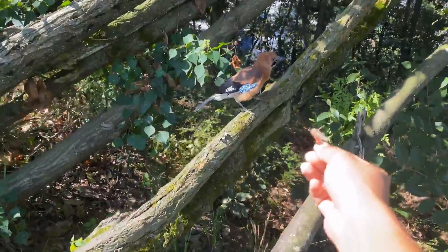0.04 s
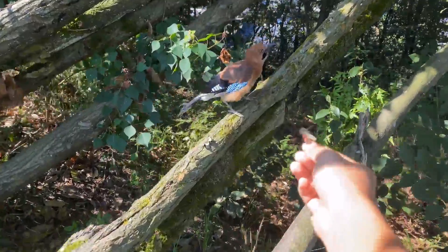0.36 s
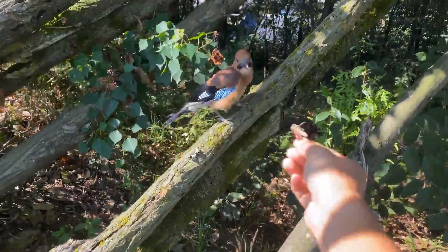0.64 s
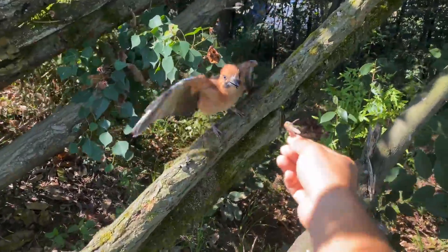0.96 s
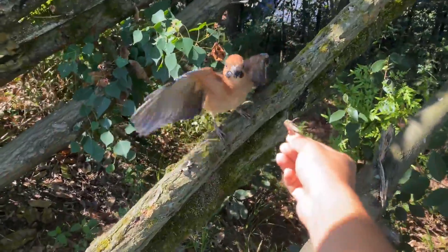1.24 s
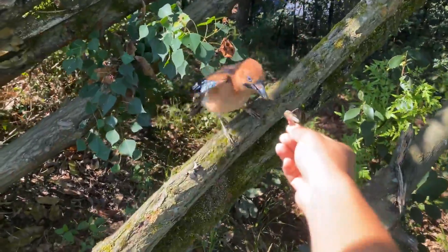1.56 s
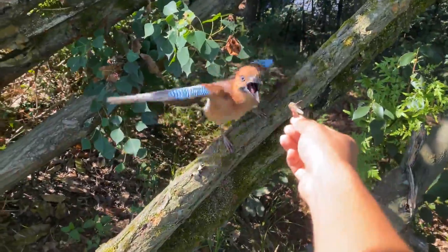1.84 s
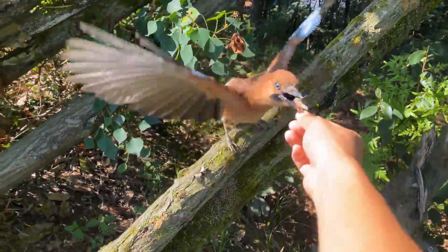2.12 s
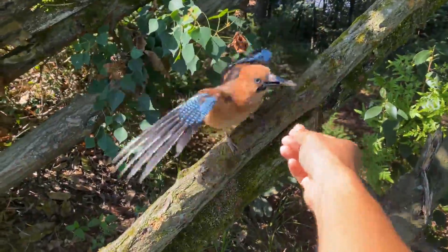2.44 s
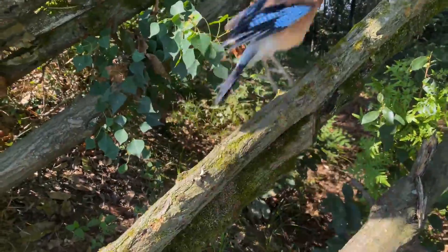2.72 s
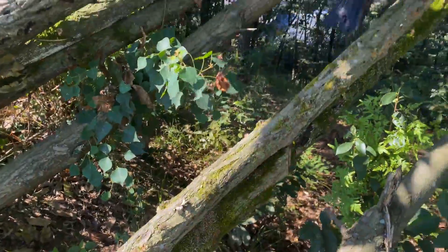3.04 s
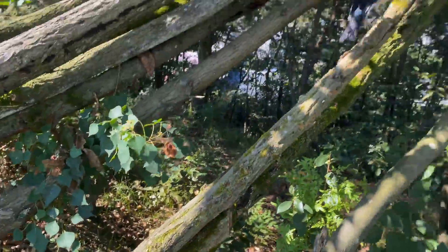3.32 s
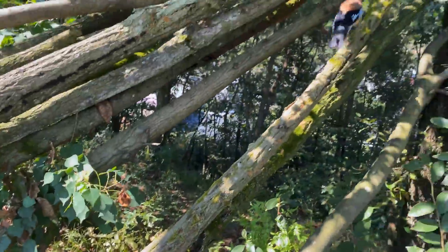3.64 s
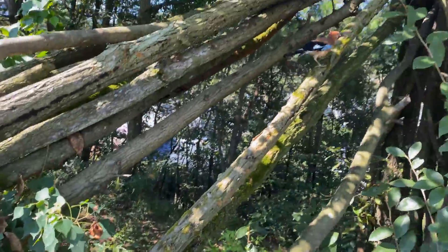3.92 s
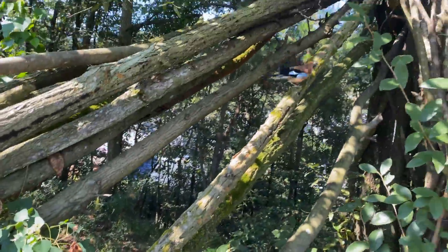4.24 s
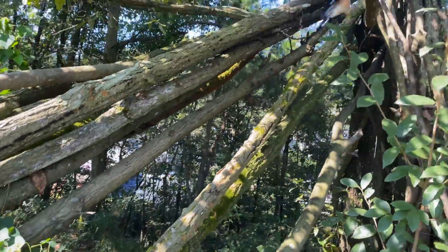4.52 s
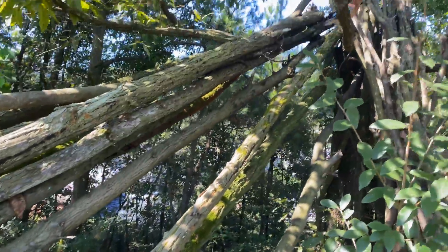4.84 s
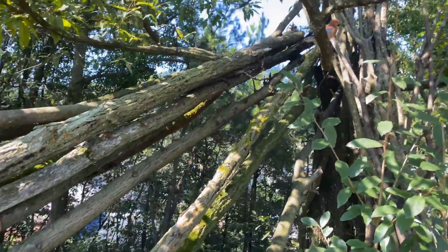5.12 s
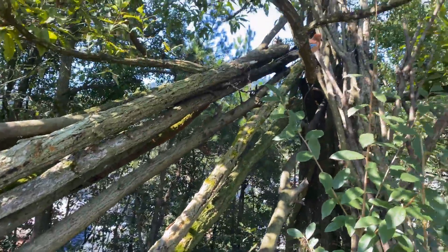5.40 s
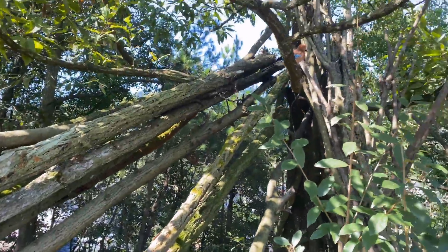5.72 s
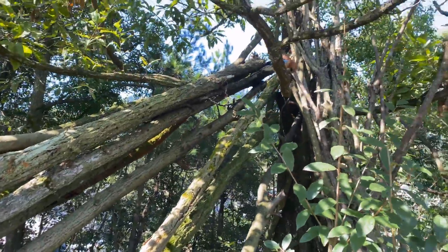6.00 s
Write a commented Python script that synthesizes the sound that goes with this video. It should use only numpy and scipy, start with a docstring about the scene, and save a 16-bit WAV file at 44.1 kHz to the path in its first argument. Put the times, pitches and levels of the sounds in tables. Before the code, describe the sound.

A close jay begs with a few soft mews, then gives three harsh rasping calls over steady insect hiss in woodland.

```python
"""A tame jay on a log, close to the microphone, begs with a few soft mews, then three harsh rasps,
takes its food and flutters up the woodpile. The two sides of its syrinx sound at different pitches and
modulate each other, which makes the rasp. Insects hiss all around in the trees over a faint low
rumble, and a far bird whistles at the end. The recorder's gain ducks a little after the loudest call."""
import sys
import numpy as np
from scipy import signal
from scipy.fft import rfft, irfft, next_fast_len
from scipy.io import wavfile
from scipy.ndimage import uniform_filter1d, map_coordinates

SR = 44100
rng = np.random.default_rng(int(sys.argv[2]) if len(sys.argv) > 2 else 0)


def materialize(psi):
    """Save the field psi as 16-bit PCM at rate SR to the path in sys.argv[1].

    A 1-D psi becomes a single channel; in a 2-D psi each row is a channel.
    """
    bounded = np.clip(np.atleast_2d(psi).T, -1, 1)
    quanta = np.round(bounded * 32767).astype(np.int16)
    wavfile.write(sys.argv[1], SR, quanta)


N = 267510


def amp(db):
    """Decibels to gain."""
    return 10 ** (np.asarray(db) / 20)


def unit(x):
    """Scaled to rms 1."""
    return x / np.sqrt(np.mean(x ** 2) + 1e-20)


def along(points, hz):
    """(Hz, value) points read on a log axis."""
    f, v = np.transpose(points)
    return np.interp(np.log(hz + 1), np.log(f + 1), v)


def curves(rows):
    """One value per sample for each column after the time."""
    s, *cols = np.transpose(rows)
    return [np.interp(np.arange(N) / SR, s, c) for c in cols]


def wobble(rate):
    """A smooth random curve, rate knots a second."""
    knots = rng.standard_normal(int(N * rate / SR) + 4)
    return map_coordinates(knots, [np.arange(N) * rate / SR])


def filtered(x, response):
    """x times a complex response of frequency."""
    n = x.shape[-1]
    m = next_fast_len(n + SR // 4)
    return irfft(rfft(x, m) * response(np.fft.rfftfreq(m, 1 / SR)), m)[..., :n]


def steady(x):
    """x held at rms 1, keeping its fast beats."""
    power = np.abs(uniform_filter1d(x ** 2, size=SR // 40))
    return x / np.sqrt(power + 1e-4 * np.mean(x ** 2))


def rush(spectrum, likeness, patchy_db):
    """Stereo noise of rms 1 with patches of random gain."""
    z = signal.stft(rng.standard_normal((2, N)), nperseg=512)[2]
    patches = uniform_filter1d(rng.standard_normal(z.shape[1:]), size=5, axis=0)
    patches = unit(uniform_filter1d(patches, size=12, axis=1))
    pair = signal.istft(z * amp(patchy_db * patches), nperseg=512)[1][:, :N]
    turn = lambda hz: np.arccos(np.clip(along(likeness, hz), -1, 1)) / 2
    mid, side = filtered(pair, lambda hz: amp(along(spectrum, hz)) * [np.cos(turn(hz)), np.sin(turn(hz))])
    return unit(np.array([mid + side, mid - side]))


def fades(s, attack_s, release_s):
    """Straight rise at the start and fall at the end of a call, each 0-1."""
    return np.minimum((s - s[0]) / attack_s, 1), np.minimum((s[-1] - s) / release_s, 1)


def mews(sum_db=-7, gape=0.152):
    """Soft begging: both pitches swoop with the pressure as the mouth glides. Yields rows of controls."""
    # Each row: mouth resonance in Hz at start and end, other side against leading side in dB, course.
    # Each course row: time in seconds, leading and other pitch in Hz, voice and rasp in dB, roughness 0-1.
    calls = [((2300, 3300), -1.5, [(-.03, 1808, 2200, -51, -43, 0.31), (.08, 1505, 1860, -44, -46, 0.33),
             (.15, 1100, 1500, -43, -47, 0.48), (.18, 980, 1400, -67, -60, .4)]), ((3300, 2500),
             -3, [(.583, 1100, 1300, -58, -41, .6), (.603, 1276, 1450, -43, -27.5, 0.66),
             (.621, 1338, 1700, -36, -28.5, 0.49), (.638, 1537, 2230, -37, -35, 0.4),
             (.658, 1637, 2300, -38, -36, 0.34), (.676, 1235, 1650, -51, -37, 0.43),
             (.692, 1006, 1350, -41, -39, 0.45)]), ((2500, 3000), 3, [(.693, 980, 1340, -42, -37, 0.41),
             (.715, 937, 1300, -58, -43, .5), (.745, 892, 1400, -60, -42, .6)]), ((2950, 2700),
             -2.5, [(.795, 1750, 2100, -52, -42, 0.59), (.82, 1326, 1620, -46.5, -35.5, 0.79),
             (.842, 1108, 1400, -43.5, -40, 0.71), (.878, 1000, 1280, -48.5, -40, 0.59),
             (.912, 1352, 1600, -41, -31.5, 0.58), (.934, 1339, 1840, -33.5, -36, 0.23),
             (.975, 1295, 1920, -37.5, -37, .45), (1.002, 1452, 1900, -38.5, -30, .95),
             (1.035, 1220, 1620, -39.5, -41, .65), (1.078, 800, 1180, -59, -62, .3)]), ((3500, 2530),
             -10, [(1.318, 877, 1700, -62, -40, 0.78), (1.35, 959, 1730, -54, -36, 0.74),
             (1.38, 1240, 1500, -49, -45, 0.23), (1.42, 1236, 1540, -45, -37, .2),
             (1.445, 1134, 1480, -47.5, -36, 0.42), (1.462, 951, 1380, -59, -43, 0.51),
             (1.505, 898, 1400, -68, -49, 0.62)])]
    for mouth_ends_hz, other_db, course in calls:
        knots, *cols = np.transpose(course)
        s = np.linspace(knots[0], knots[-1], 200)
        lead_hz, other_hz, voice_db, rasp_db, rough = [np.interp(s, knots, c) for c in cols]
        rise, fall = fades(s, attack_s=0.011, release_s=0.01)
        voice, rasp = rise * fall * amp([voice_db, rasp_db])
        mouth_hz = np.linspace(*mouth_ends_hz, len(s))
        yield np.column_stack(np.broadcast_arrays(
            s, lead_hz, other_hz, voice, rasp, rough, mouth_hz, other_db, sum_db, gape))


def syrinx(lead_hz, other_hz, mouth_hz, other_db, sum_db, jitter, sounding, mouth_width_hz):
    """Two coupled, trembling membranes. Returns fundamentals, overtones with sum tones, and their beat."""
    shared, tremor = wobble(350), 1 + .0075 * wobble(55)
    lead, other = [2 * np.pi * np.cumsum(hz * tremor * (1 + jitter * (shared + wobble(800)))) / SR
                   for hz in (lead_hz, other_hz)]
    controls = [lead, other, lead_hz, other_hz, mouth_hz, other_db, sum_db]
    a, b, a_hz, b_hz, mouth_hz, other_db, sum_db = [v[sounding] for v in controls]
    knot = np.flatnonzero(sounding) * 45 / SR
    tones = np.zeros((2, N))
    for k in range(1, 11):
        for j in range(-1, k + 2):  # j of the k multiples come from the other side
            if j == 0:  # harmonics of the leading side
                db = 0
            elif j == k:  # harmonics of the other side
                db = other_db if k == 1 else sum_db + (2 if k == 2 else 0)
            elif 0 < j < k:  # sum tones
                db = sum_db - 2
            else:  # difference tones
                db = sum_db - 15 + (other_db if k == 1 else 0)
            partial_hz = (k - j) * a_hz + j * b_hz
            mouth_db = 8.5 / (1 + ((partial_hz - mouth_hz) / mouth_width_hz) ** 2)
            drift = rng.standard_normal(N // 900)
            waver_db = 3 * np.interp(knot, np.arange(len(drift)), drift)  # each partial swells on its own
            phase = (k - j) * a + j * b + rng.uniform(0, 2 * np.pi)
            tones[min(k - 1, 1), sounding] += amp(db + mouth_db + waver_db) * np.sin(phase)
    return tones[0], tones[1], np.cos(lead - other)


def jay(mouth_width_hz=430):
    """Fundamentals (voice) and overtones (rasp) swell separately; turbulence puffs and rings the mouth."""
    # The windpipe. Each row: frequency in Hz, gain in dB.
    throat = [(500, -42), (900, -17.5), (1300, -15), (1950, -3.5), (2280, -12), (2720, -7.5), (3300, -3),
              (4100, -10.5), (5250, -7.5), (5600, -14), (6300, -6.5), (7500, -18.5), (9500, -17.5),
              (11500, -21.5), (13000, -28)]
    controls = curves(sorted(np.vstack([*mews(), *harsh_calls()]).tolist()))
    lead_hz, other_hz, voice_gain, rasp_gain, rough, mouth_hz, other_db, sum_db, gape = controls
    sounding = voice_gain > amp(-68)
    slack = rough * (1 - gape)  # soft calls stutter in pitch and level, unlike calls at full pressure
    flutter = 1 + .06 * slack * wobble(90)
    gravel = amp(7 * slack * wobble(190))
    jitter = .013 * (.8 * rough + 2.9 * slack)
    fundamentals, overtones, beat = syrinx(
        flutter * lead_hz, flutter * other_hz, mouth_hz, other_db, sum_db, jitter, sounding, mouth_width_hz)
    puffs = rng.standard_normal(N) * (1 + 0.5 * beat)
    low = lambda hz: 1 / (1 + (hz / 2400) ** 16)
    low_puffs = (.36 + .7 * slack) * rough * unit(filtered(puffs, low))
    high_puffs = (.62 * rough + .5 * slack) * unit(filtered(puffs, lambda hz: 1 - low(hz)))
    mouth_phase = 2 * np.pi * np.cumsum(mouth_hz) / SR
    hiss = wobble(mouth_width_hz) * np.cos(mouth_phase) + wobble(mouth_width_hz) * np.sin(mouth_phase)
    crackle = amp(2.2 * rough * wobble(300))
    voice = gravel * np.sqrt(crackle) * (steady(fundamentals) + low_puffs)
    rasp = gravel * crackle * (steady(overtones) + high_puffs + (.1 * rough + .7 * slack) * hiss)
    voice, rasp = [steady(filtered(v, lambda hz: amp(along(throat, hz)))) for v in (voice, rasp)]
    # with the bill half closed the voice loses its top and the rasp narrows to the band of the mouth
    dull = steady(filtered(voice, lambda hz: 1 / (1 + (hz / 1900) ** 10)))
    muffled = steady(filtered(rasp, lambda hz: hz ** 4 / (hz ** 4 + 1900 ** 4) / (1 + (hz / 4300) ** 6)))
    voice = gape * voice + (1 - gape) * dull
    rasp = gape * rasp + (1 - gape) * muffled
    return voice_gain * voice + rasp_gain * rasp


def insects(shrill_hz=4815, half_width_hz=105):
    """A wide chorus in the trees, uneven from pitch to pitch, with one shrill band that flutters."""
    # The chorus. Each row: frequency in Hz, relative level in dB.
    spectrum = [(1200, -43), (2200, -25.5), (2950, -17), (3450, -7.5), (4400, -6), (4800, -6.5),
                (5300, -8.5), (6000, -6.5), (6700, -4), (7900, -9), (8400, -6), (10500, -12), (12300, -13),
                (13600, -10)]
    # Its spread. Each row: frequency in Hz, left-right likeness from -1 to 1.
    likeness = [(1500, 0.093), (7800, 0.041), (8500, -0.75), (10000, -0.2), (11000, 1), (12200, 0.5),
                (13200, -0.97)]
    # The shrillest insects. Each row: time in seconds, level in dB.
    swell = [(0, -40.5), (1.5, -43.5), (2.6, -43), (3.6, -44.5), (4.3, -42), (5.4, -42), (6.07, -42.5)]
    chorus = amp(-30.5 + 0.098 * wobble(20.88)) * rush(spectrum, likeness, patchy_db=1.2)
    uneven_db = 1.2 * rng.standard_normal(SR // 200)
    bands_hz = np.linspace(0, SR / 2, len(uneven_db))
    chorus = filtered(chorus, lambda hz: amp(np.interp(hz, bands_hz, uneven_db)))
    band = lambda hz: 1 / (1 + ((hz - shrill_hz) / half_width_hz) ** 2)
    shrill = unit(filtered(rng.standard_normal((2, N)), band))
    shrill_db, = curves(swell)
    shrill *= amp(shrill_db + wobble(5) + 1.8 * wobble(90))
    return (chorus + shrill) * amp([[.3], [-.3]])  # a touch to the left


def air():
    """Low rumble of the open air, slowly swelling and easing."""
    # The rumble. Each row: frequency in Hz, relative level in dB.
    spectrum = [(20, -23), (55, 0), (72, 0.5), (92, 0), (160, -6), (250, -10), (330, -7), (420, -9),
                (520, -7.5), (750, -13), (1150, -17.5), (1600, -12), (2800, -17.5), (5000, -70)]
    # Its spread. Each row: frequency in Hz, left-right likeness from -1 to 1.
    likeness = [(60, 0.94), (130, 1), (300, 0.13), (640, -0.34), (1500, -0.26)]
    # Its slow fall. Each row: time in seconds, level in dB.
    levels = [(0, -49.5), (2.8, -49.5), (3.7, -50), (4.6, -50.5), (5.2, -52), (6.07, -53)]
    level_db, = curves(levels)
    return amp(level_db + .5 * wobble(6)) * rush(spectrum, likeness, patchy_db=1.3)


def knocks(width_octaves=0.54):
    """Feet, bill and wings close by: bursts of band noise; the longer one lasts, the softer it starts."""
    # Taps, flaps and rustles. Each row: start in seconds, level in dB, centre in Hz, t60 in seconds.
    taps = [(.335, -32.5, 730, 0.013), (0.513, -41, 1640, 0.025), (1.949, -43, 1095, 0.037),
            (2.975, -39, 302, 0.068), (3.21, -44.5, 1920, 0.14), (3.43, -42.5, 330, 0.17),
            (3.435, -51.5, 820, 0.2), (4.33, -55, 151, 0.21), (4.46, -52, 120, 0.23),
            (4.58, -56, 148, 0.28), (4.721, -53.5, 120, 0.27), (5.69, -51.5, 714, 0.19)]
    out, t = np.zeros(N + SR), np.arange(SR // 4) / SR
    for s, db, centre_hz, t60 in taps:
        band = lambda hz: np.exp(-.5 * (np.log2((hz + 1) / centre_hz) / width_octaves) ** 2)
        burst = unit(filtered(rng.standard_normal(len(t)), band))
        rise_s = 0.062 * t60
        envelope = np.minimum(t / rise_s, 1) * amp(db - 60 * np.maximum(t - rise_s, 0) / t60)
        out[round(s * SR):][:len(t)] += burst * envelope
    return out[:N]


def harsh_calls(sag_s=.032):
    """The voice holds level under a swelling rasp; pitch sags as pressure goes. Yields rows of controls."""
    # Each row: voice in dB, opening of the bill 0-1, share of pitch lost at the end, course.
    # Each course row: time in seconds, leading and other pitch in Hz, rasp in dB, roughness 0-1, mouth
    # resonance in Hz, then the other side's fundamental and the coupling, in dB against the leading side.
    calls = [(-35, 0.99, .25, [(1.662, 1476, 1204, -29, 0.81, 3200, 7, -4),
             (1.715, 1695, 1354, -28.5, .85, 3500, -3, -6), (1.742, 1637, 1345, -27, 0.89, 3800, -5, -4),
             (1.77, 1542, 1293, -23.5, 0.77, 5900, -10, -4), (1.82, 1520, 1309, -22.5, .8, 6000, -6, -2),
             (1.85, 1480, 1272, -22, 0.98, 4600, 0, -1), (1.895, 1443, 1240, -20.5, 0.93, 4150, -6, -7),
             (1.938, 1380, 1188, -26, 0.88, 4100, 0, -5)]),
             (-35.5, .95, .33, [(2.005, 1356, 1138, -20.5, 0.53, 2700, -3, -8),
             (2.047, 1495, 1130, -20, 0.5, 3150, -9, -14), (2.075, 1433, 1088, -23.5, 0.63, 4200, -12, -4),
             (2.1, 1321, 1037, -19.5, 0.55, 4200, -8, 2), (2.15, 1305, 1026, -15, 0.47, 3900, -9, -5),
             (2.19, 1268, 1023, -18, 0.64, 3500, -8, 1), (2.255, 1235, 1004, -23, .9, 4100, -6, -2.5),
             (2.305, 1365, 1052, -23, 0.52, 2750, -8, -7), (2.345, 1252, 1050, -22, .3, 3900, -14, -10),
             (2.375, 1320, 1096, -25.5, .3, 5090, -11, -5.5), (2.43, 1344, 1125, -25, 0.34, 2885, -4, -3.5),
             (2.48, 1437, 1097, -28, .25, 2924, -4.5, -7), (2.54, 1500, 1073, -53, 0.5, 2980, 0, -4)]),
             (-39.5, 0.74, 0.111, [(2.618, 1347, 1006, -43, 0.48, 2600, -2, -2),
             (2.665, 1307, 973, -31, 0.42, 3000, -5, -6), (2.705, 1234, 934, -26, 0.27, 3600, -6.5, 3),
             (2.76, 1203, 935, -27.5, 0.16, 3600, -4, -1), (2.795, 1170, 913, -27.5, 0.27, 4700, -5, -1),
             (2.83, 1165, 897, -26.5, 0.28, 3560, -7, 6), (2.92, 1198, 937, -30, 0.37, 3450, -5, -1),
             (2.972, 1167, 920, -28, 0.56, 3400, 1, 1.5)])]
    for voice_db, gape, sag_share, course in calls:
        knots, *cols = np.transpose(course)
        s = np.linspace(knots[0], knots[-1], 300)
        lead_hz, other_hz, rasp_db, rough, mouth_hz, other_db, sum_db = [
            np.interp(s, knots, c) for c in cols]
        rise, fall = fades(s, attack_s=0.043, release_s=0.03)
        sag = 1 - sag_share * np.maximum(1 - (s[-1] - s) / sag_s, 0)
        voice = rise * fall * amp(voice_db)
        rasp = rise * fall ** 2 * amp(rasp_db)  # dies before the voice
        yield np.column_stack(np.broadcast_arrays(
            s, sag * lead_hz, sag * other_hz, voice, rasp, rough, mouth_hz, other_db, sum_db, gape))


def far_bird():
    """One thin, slightly rising whistle from far off in the trees."""
    # Each row: time in seconds, pitch in Hz, level in dB.
    whistle = [(5.96, 1453, -92), (5.99, 1500, -59), (6.07, 1530, -61)]
    pitch_hz, level_db = curves(whistle)
    pitch_hz *= 1 + 0.0103 * wobble(110)
    return amp(level_db) * unit(np.sin(2 * np.pi * np.cumsum(pitch_hz) / SR))


def microphone(x):
    """A near source reaches the two microphone ports with different level and phase."""
    # Each row: frequency in Hz, left minus right in dB.
    side = [(200, -5.5), (600, -15.5), (1000, -4), (1450, -8.5), (2000, 4.5), (2700, 3.5), (4400, 7.5),
            (8100, 4.5), (13000, -3)]
    # Each row: frequency in Hz, lead of the left port in radians.
    lead = [(100, 8), (1000, -0.5), (1300, -2.5), (1550, 1.5), (2000, -2), (2280, -2), (2670, -1.28),
            (3800, -5), (6000, -8), (8350, -8.5), (11000, -7.5), (13100, -3.5)]
    half = lambda hz: amp(along(side, hz) / 2) * np.exp(.5j * along(lead, hz))
    return filtered(x, lambda hz: np.array([half(hz), 1 / half(hz)]))


def woods(x, logs_db, trees_db, logs_t60=.035):
    """The nearby logs scatter the sound at once; the trees add a faint tail."""
    # Decay among the trees. Each row: frequency in Hz, t60 in seconds.
    decay = [(300, 0.14), (2500, 0.77), (12000, 0.033)]
    hz, t, z = signal.stft(rng.standard_normal((2, SR // 2)), SR, nperseg=256)
    tail = signal.istft(z * amp(-60 * t / along(decay, hz)[:, None]), SR, nperseg=256)[1]
    logs = rng.standard_normal(tail.shape) * amp(-60 * np.arange(tail.shape[1]) / SR / logs_t60)
    echo = amp(trees_db) * tail / np.linalg.norm(tail[0]) + amp(logs_db) * logs / np.linalg.norm(logs[0])
    delayed = np.pad(x, (SR // 500, 0))
    return signal.fftconvolve(delayed[None], echo, axes=1)[:, :N]


def scene():
    """The jay close to the microphone, shifting on its log, the wood all around."""
    # The jay's shifts. Each row: time in seconds, left minus right in dB.
    pan = [(1.0, 0), (1.8, -2), (2.2, -1.2), (2.8, -.5)]
    pan_db, = curves(pan)
    bird = jay() + knocks()
    direct = microphone(bird) * amp([pan_db / 2, -pan_db / 2])
    return direct + woods(bird, logs_db=-9, trees_db=-22) + far_bird() + insects() + air()


def record(dry, limit_db=-17, recovery_db_per_s=1.1, top_hz=13200):
    """The gain control backs off at the loudest call and creeps up again; nothing passes above top_hz."""
    power = np.abs(uniform_filter1d(np.mean(dry ** 2, axis=0), size=SR // 15))
    over_db = np.maximum(10 * np.log10(power + 1e-12) - limit_db, 0)
    recovered_db = recovery_db_per_s * np.arange(N) / SR
    cut_db = np.maximum.accumulate(over_db + recovered_db) - recovered_db
    return filtered(dry * amp(-cut_db), lambda hz: hz < top_hz)


dry = scene()
out = record(dry)
materialize(out)
```